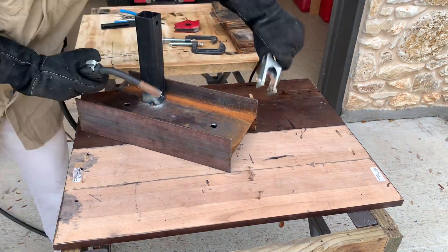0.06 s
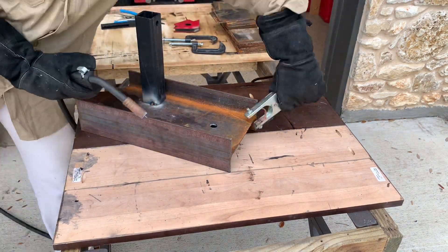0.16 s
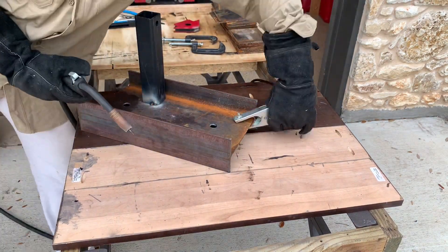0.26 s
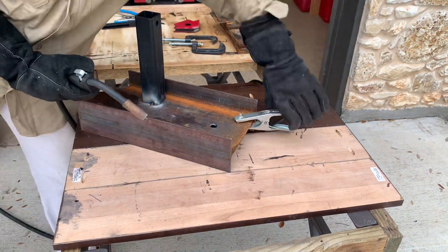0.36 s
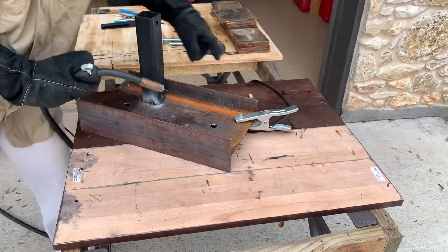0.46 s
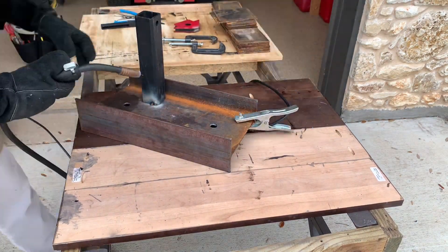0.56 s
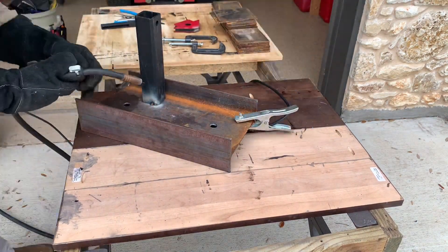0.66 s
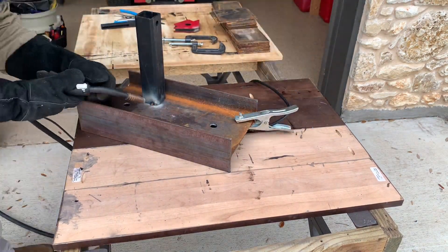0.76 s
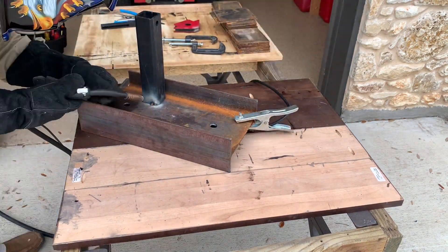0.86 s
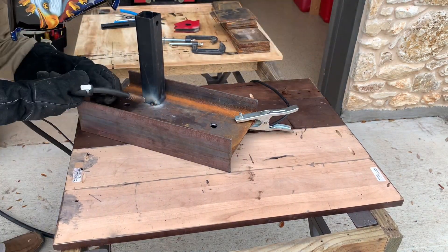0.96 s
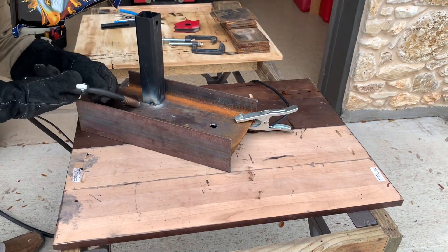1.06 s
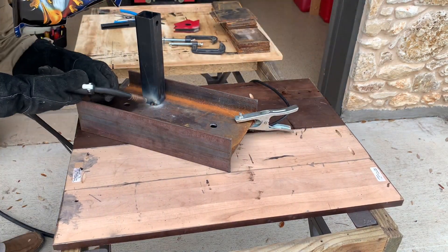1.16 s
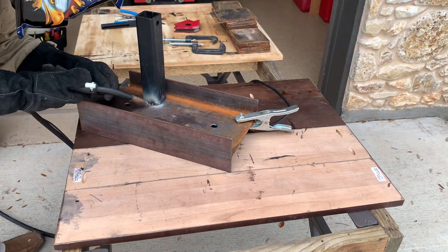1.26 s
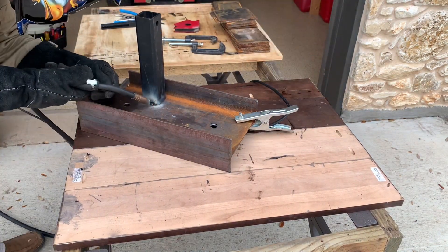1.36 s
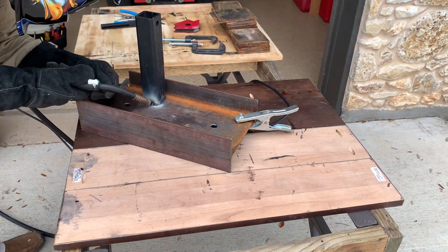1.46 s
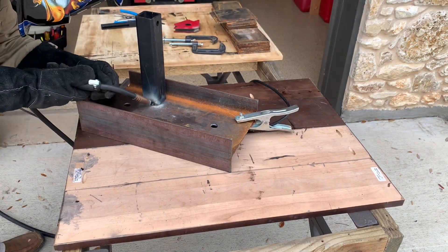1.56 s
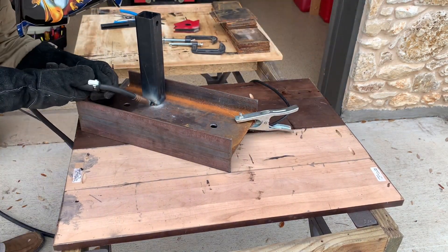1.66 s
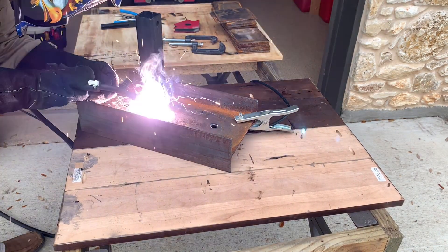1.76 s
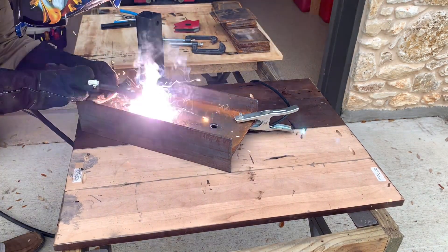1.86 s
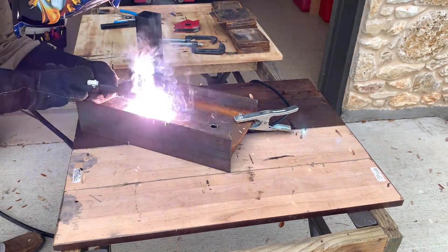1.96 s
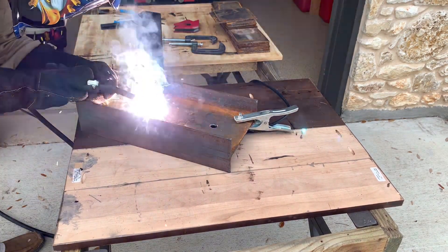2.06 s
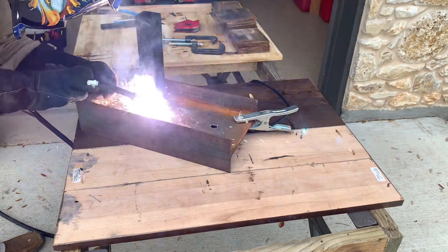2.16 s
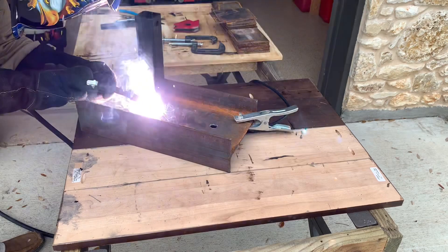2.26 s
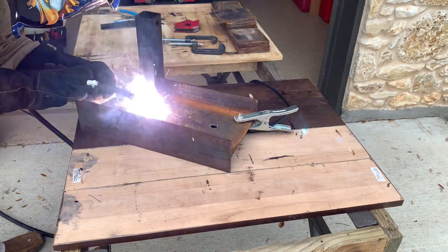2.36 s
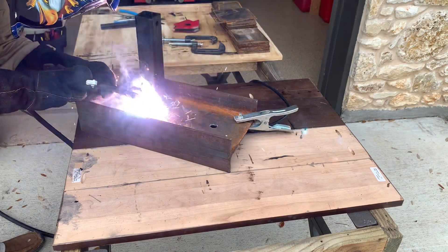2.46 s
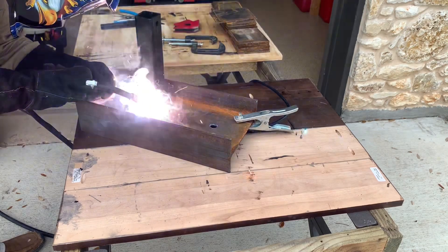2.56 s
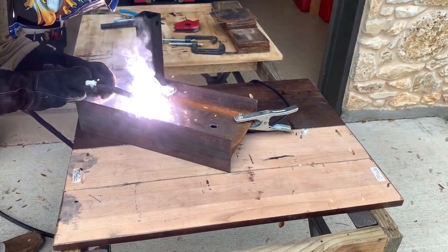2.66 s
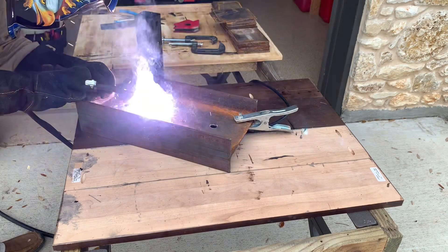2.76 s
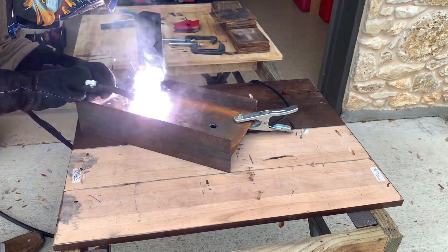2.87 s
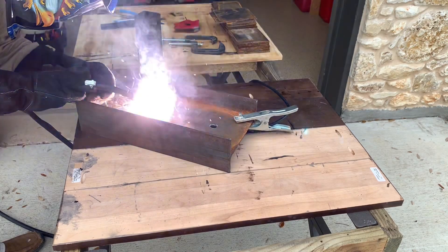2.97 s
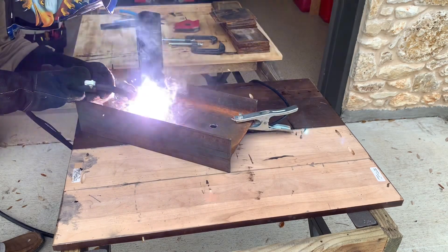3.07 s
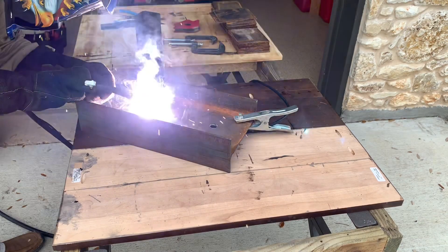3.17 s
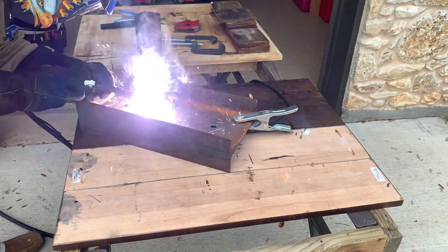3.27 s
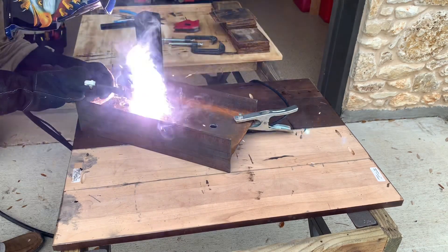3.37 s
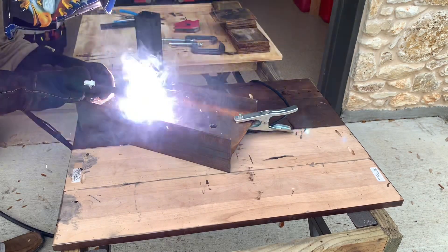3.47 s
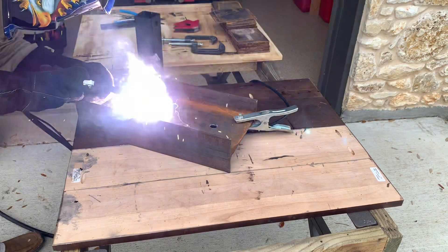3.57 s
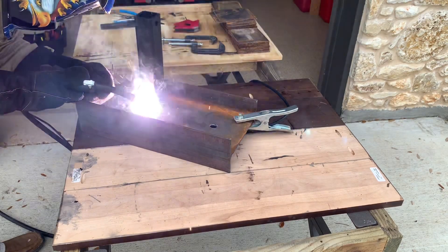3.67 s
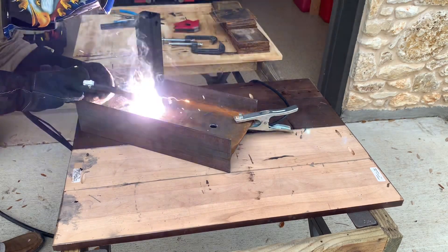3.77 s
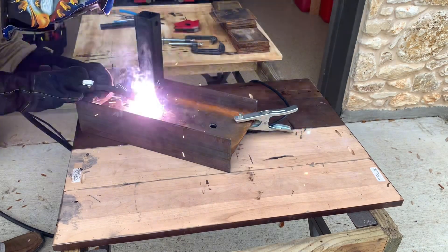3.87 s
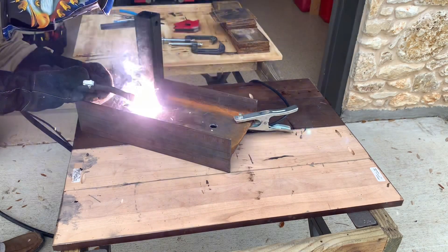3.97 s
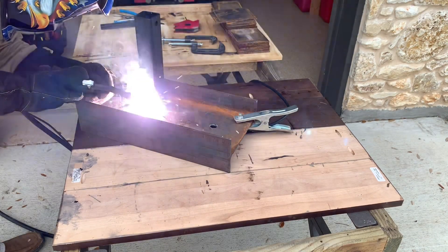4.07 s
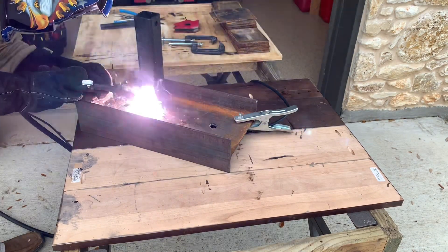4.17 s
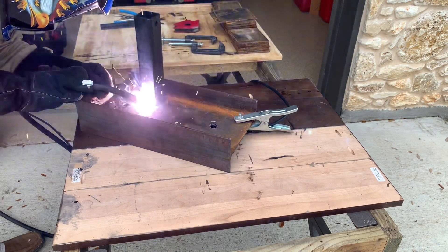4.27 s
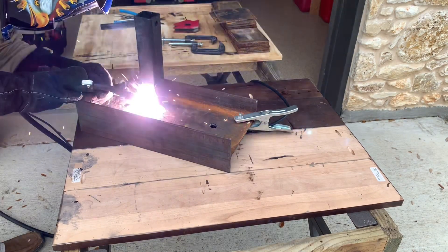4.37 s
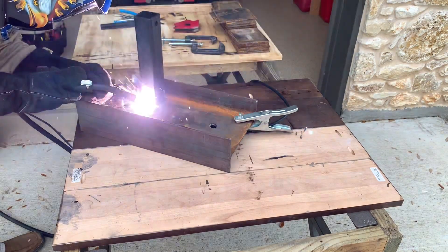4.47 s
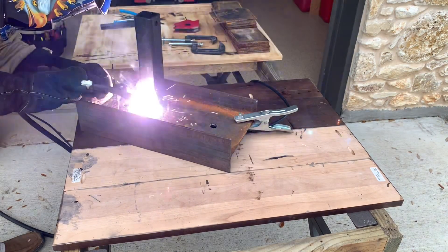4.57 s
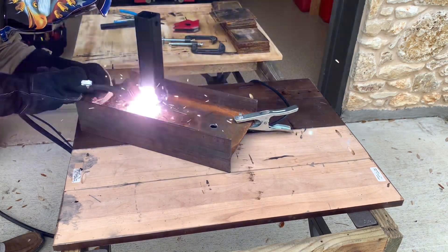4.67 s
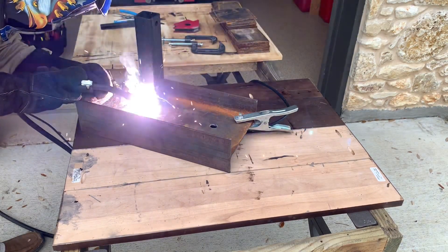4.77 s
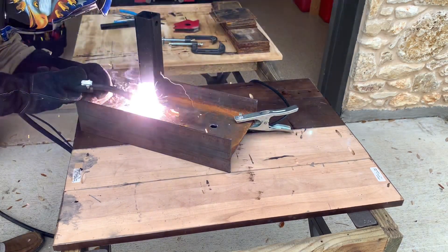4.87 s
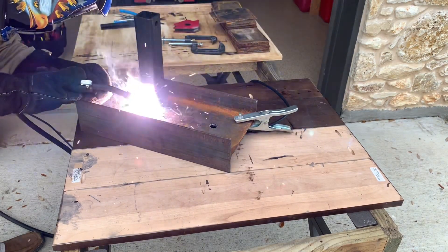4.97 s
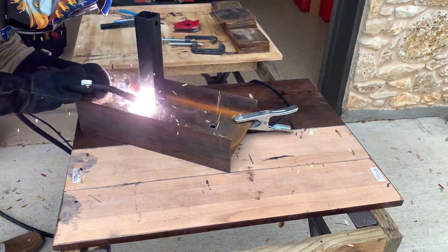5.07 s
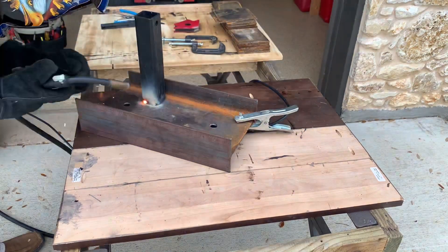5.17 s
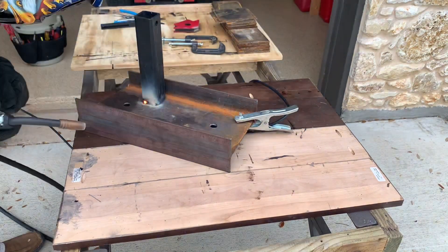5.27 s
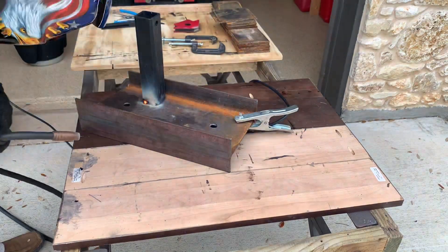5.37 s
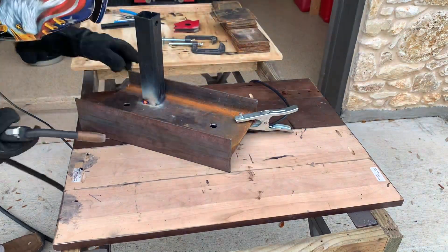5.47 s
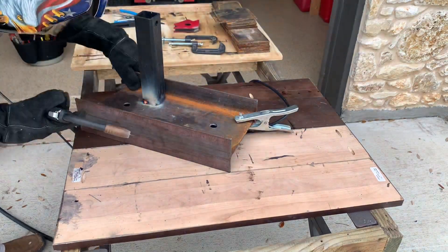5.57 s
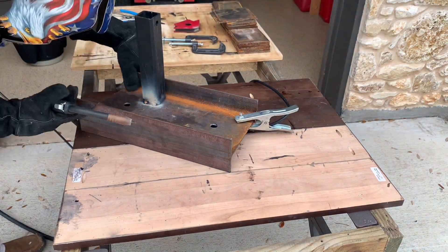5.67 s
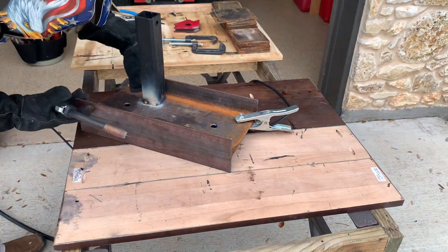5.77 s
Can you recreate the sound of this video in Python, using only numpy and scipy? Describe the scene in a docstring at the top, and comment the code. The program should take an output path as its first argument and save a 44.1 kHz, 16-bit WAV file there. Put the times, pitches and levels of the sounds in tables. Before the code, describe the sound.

A workshop doorway, heard in stereo from a phone about a metre away, with short reflections off bench and door frame. A fan murmurs behind: a low fluttering hum near 240 Hz over soft rushing air. At 0.1 s a glove bumps the wooden bench with a dull knock. From 0.2 to 0.36 s a spring clamp scrapes in quick gritty strokes and snaps onto steel with short rings. A tick at 0.54 and a nozzle slide at 0.66 follow, with soft glove rubs until about 1.3 s. At 1.73 s a weld strikes abruptly: loud, bright, dense frying, broken about thirty times a second by irregular tiny dips, sharp cracks and low gas puffs. The puffs are heaviest early, easing as it goes on. The fan is almost buried. At 5.13 s the arc cuts dead; the hum returns with light metallic ticks, a faint bump at 5.35 and tiny touches until 5.6, ending around 5.8 s.

```python
"""In a workshop doorway, about a metre from a phone with two microphone ports, a glove bumps the bench.
A spring earth clamp then scrapes and snaps onto a steel channel, gloves rub and a nozzle slides on the steel.
One wire-feed weld follows: frying grains that each short dims and each restrike bursts with a crack and gas puff.
Light ticks and a faint bump come after it. Behind it all lies a fan, fluttering blade tones over rushing air;
its tones fade almost away under the weld and return at its end."""
import sys
import numpy as np
from scipy import signal
from scipy.fft import rfft, irfft
from scipy.io import wavfile
from scipy.ndimage import uniform_filter1d, map_coordinates

SR = 44100
rng = np.random.default_rng(int(sys.argv[2]) if len(sys.argv) > 2 else 0)


def bounce(signal):
    """Save signal as a 16-bit WAV file at the path given by the first command-line argument."""
    frames = np.transpose(np.atleast_2d(signal))
    limited = np.clip(frames, -1, 1)
    pcm = np.round(limited * 32767).astype(np.int16)
    wavfile.write(sys.argv[1], SR, pcm)


N = 257103

# Levels in the tables are relative: filters and mixing gains follow.
# wire stubs into the pool and blows clear: start_s, crack_db, thump_db, hiss_at_short_db, hiss_relit_db
SHORTS = [(1.7318, -18, -30, 3.5, -4), (1.747, -19, -40, -0.5, 5), (1.757, -24, -33, 8, 3),
          (1.816, -22.5, -37.0, -6, -18), (1.8305, -21, -33, -2, -11), (1.8469, -19, -41.5, 1, 4),
          (1.8563, -14, -26.5, 6, 4), (1.884, -18, -27, 4, 4), (1.92, -20, -34, 1, 0.5),
          (1.9528, -21, -35, -5, 4), (1.969, -20, -34.5, 4, 1.5), (2.0371, -18.5, -46.5, -2, 1),
          (2.0576, -23, -46, -6, -7), (2.073, -26, -51, 1, 1.5), (2.096, -18, -28, 2, -5.5),
          (2.1287, -21, -31.5, -0.5, -3.5), (2.166, -20.5, -29.5, 2.5, 5), (2.21, -21.5, -38, -6, -1),
          (2.226, -24.5, -43, -2, -7.5), (2.2626, -24, -45.5, 6, -2), (2.282, -20, -57, 4, 4),
          (2.3248, -21.5, -62, -5, 0), (2.355, -23.5, -55.5, -3, -15), (2.3628, -23, -48, -3, -1),
          (2.3726, -23, -40.5, 0, 1), (2.4298, -22, -29, 3, 4), (2.5176, -23, -35, 2, 4),
          (2.5864, -21.5, -50, -4.5, -2), (2.5955, -23, -49, -3, 5), (2.6697, -20, -50.0, -4.5, -9.5),
          (2.6914, -20.5, -33, -6, -18), (2.705, -18.5, -35.5, -6, 5), (2.7174, -22, -36, 4, -2),
          (2.74, -24, -37, 4.5, -3), (2.767, -19, -36, 0, -9.5), (2.7965, -19.5, -31, -11, -13),
          (2.8129, -19, -32.5, 3.5, 0.5), (2.9136, -17, -44, 0.5, -6), (2.9356, -20.5, -48.0, -2.5, 3),
          (3.0171, -17.5, -35, 0.0, 4), (3.1368, -23, -36.5, 0.5, -8), (3.1577, -19.5, -45.5, -8, -4),
          (3.1791, -18.5, -42, 0, -8), (3.192, -22, -32, -2.5, 2), (3.203, -23, -49, -2, 3),
          (3.2206, -22, -34, 3.5, 6.5), (3.289, -22, -33.5, 1, -5), (3.3115, -21, -34.5, 1, -1),
          (3.329, -21, -34, -4, 6), (3.3372, -23, -43, 5, 3), (3.3644, -20.5, -37, 5, 0),
          (3.3998, -22, -53, -4, 2), (3.4316, -20, -56, -3, 5), (3.441, -21.5, -39.5, 0.5, -4),
          (3.4688, -33, -45, 9.5, -10), (3.48, -24, -37, -8, -9), (3.4992, -20, -35.5, -11, -5),
          (3.5179, -19.5, -36, 0, -3), (3.5403, -19, -42, 1, 0.5), (3.5656, -24, -35, 0.5, 2),
          (3.6084, -26, -54, -11, -7), (3.63, -19.5, -37.5, -4, -0.5), (3.66, -24, -52, -2, -11),
          (3.6693, -25, -47, -19, -4), (3.6857, -17.5, -40.0, -6, -9.5), (3.7009, -21, -37, 1, -15),
          (3.715, -20.5, -51, 3, -4), (3.7426, -20, -47.5, 0.5, 5), (3.813, -24, -45, 0, -3),
          (3.8348, -19.5, -44, -9, -7), (3.8432, -21.5, -33, -24, -2), (3.871, -18.5, -42, 2, 3.5),
          (3.9246, -25, -57, -1, -2), (3.9388, -25.5, -37.5, 1, -3), (3.9585, -27, -48, 0, -2),
          (3.9654, -21, -55, -1, -1), (3.9933, -21.0, -56, -1, 1.5), (4.034, -23.5, -44, -11, -12),
          (4.0568, -24.5, -48, -1, -5), (4.0678, -19.5, -45.5, 3.5, 1.5), (4.1063, -22, -34.5, 6.5, 3.5),
          (4.1686, -18.5, -35, -1, -7), (4.1816, -29, -40, -3, -2), (4.19, -22.5, -37, 2, -0.5),
          (4.2497, -21, -42, -0.5, -2), (4.2776, -22, -52.5, -4, -1.5), (4.2982, -20.5, -56, -9, -2),
          (4.3089, -23, -58, 2, 0), (4.325, -18, -44, 1, 3), (4.3347, -33, -50.5, 0.5, -3),
          (4.3495, -28, -52, 4, 5), (4.3537, -21.5, -48.5, -8, -10), (4.3706, -20, -39.5, 2, -4),
          (4.3882, -23, -40, -2, 3.5), (4.441, -20.5, -40, 0.5, -5), (4.4648, -18.5, -31.5, -3, -4),
          (4.4786, -27.5, -34.5, -13.5, -22), (4.4949, -21, -46.5, -5, -22), (4.5203, -21, -32, 1, -9),
          (4.5418, -17, -36, 3.5, -1), (4.5734, -21, -54.5, -1, 1), (4.5901, -24, -47, -8, 1),
          (4.6222, -18.5, -36.5, 4.5, 4.5), (4.655, -24, -46.5, -2, -2), (4.6618, -21, -40.5, -6, 0),
          (4.686, -32, -47, 3.5, 1.5), (4.721, -19.5, -35, -1, -1), (4.7408, -25, -50.5, -7, -4.5),
          (4.7644, -18, -33.5, -4, -10), (4.7871, -17.5, -32.5, -5, -6), (4.8027, -25, -54, 0.5, 2),
          (4.879, -24, -36, -1.5, -3.0), (4.8866, -23.5, -48.5, -7, -4), (4.901, -18.5, -32, 0, 2.5),
          (4.9397, -19.5, -32.5, -2, -4.0), (4.9474, -20, -53, -1.5, 0), (4.9787, -27, -36.5, 0, 1.5),
          (5.045, -19, -33, -2, 0.5), (5.0747, -25, -54, -7, -3), (5.0968, -18.5, -53, -19, -4),
          (5.1212, -17.5, -32, -1, -9)]
# colour of the arc's crackle: frequency_hz, level_db
ARC_COLOUR = [(700, -38.5), (1400, -25), (1750, -17), (2150, -7.5), (2700, -10.5), (3150, -14),
              (3480, -10.5), (4250, -16), (4700, -6), (5700, -9.5), (6170, -12), (6600, -4.5), (7600, -3.5),
              (8850, -2.5), (9150, -6.5), (9500, -4.5), (11900, -3), (12500, -6), (13200, -3.5),
              (14800, -7), (15700, -13)]
# colour of the arc's gas puffs: frequency_hz, level_db
PUFF_COLOUR = [(40, -44.5), (100, -10.5), (220, -2), (450, -1.5), (700, 0.5), (920, 6), (1150, -5),
               (1450, -15.5), (2500, -51)]
# gas booming in the hollow of the channel: pitch_hz, t60_s, level_db
HOLLOW_MODES = [(810, 0.018, -4.5), (924, 0.058, -0.5)]
# steel tube ringing faintly under the arc: pitch_hz, t60_s, level_db
TUBE_MODES = [(2220, .03, -9), (4090, 0.022, 2), (5230, 0.013, -4), (6800, 0.035, -1.5), (8740, 0.025, 5.5),
              (10300, .015, -6)]
# clamp jaws on the channel: peak_s, level_db, rise_s, decay_s, thud_db, ring_over_level_db, tilt_db_per_octave
CLAMP_STROKES = [(0.213, -50.5, 0.0049, 0.0065, -42.5, 7.5, 1.5),
                 (0.227, -51, 0.0054, 0.007, -48, 8.5, 2.5), (.276, -62, 0.008, 0.014, -51, 6, -3),
                 (0.291, -52, 0.0027, 0.007, -40.5, 0, -3), (.329, -51, 0.0072, 0.0056, -46, 6, -6.5),
                 (0.3407, -49.5, 0.0022, 0.0052, -34.5, -1, -4), (0.354, -49.5, 0.0055, 0.014, -64, -9, 9)]
# ringing of clamp and channel: pitch_hz, t60_s, level_db
STEEL_MODES = [(658, .09, 0), (1120, 0.1, -2), (1600, .04, -7), (1880, 0.098, 6), (2140, 0.098, 4),
               (2295, 0.075, 7.5), (2697, 0.067, -3), (3430, 0.08, 1.5), (3900, 0.035, 6), (4270, 0.043, 3),
               (4500, 0.05, 10.5), (4860, 0.033, -7), (4900, .04, -10), (5700, 0.064, 4), (6070, 0.04, -7),
               (6900, 0.096, 1), (7500, 0.045, -5), (8700, 0.054, -10)]
# colour of the jaws' scrape: frequency_hz, level_db
SCRAPE_COLOUR = [(500, -22), (1500, 4), (2200, 4), (4600, 5), (7000, -4), (9500, -1), (11300, -20),
                 (14000, -11), (16000, -63)]
# torch and cable tick as they are handled, and a last spark of spatter just after the arc goes out: peak_s,
# level_db, decay_s
TICKS = [(.543, -58, 0.0071), (5.177, -55, 0.0056), (5.266, -67, 0.0087), (5.34, -67, 0.017),
         (5.374, -65, 0.007), (5.519, -69, 0.021), (5.589, -69, .007)]
# ringing of the nozzle: pitch_hz, t60_s, level_db
NOZZLE_MODES = [(940, .035, 4), (1370, .03, -16), (3010, 0.028, -1), (3380, .025, -12), (3970, .02, -9),
                (7500, 0.023, -3)]
# colour of the nozzle's slide and of the bench tap: frequency_hz, level_db
CONTACT_COLOUR = [(300, 6), (900, 12), (2200, 14), (4000, 6), (8500, 0), (12000, -7), (16000, -13)]
# colour of gloves and light ticks: frequency_hz, level_db
TOUCH_COLOUR = [(300, 0.5), (900, 11), (2200, 7.5), (4500, -0.5), (8000, 1.5), (12000, -14), (16000, -14.5)]
# glove bumps the bench: start_s, level_db, contact_s
KNOCKS = [(0.104, -44, .0004), (0.111, -36.5, .00012), (0.115, -24.5, 0.00075), (5.348, -47, 0.00021)]
# wooden bench top: pitch_hz, t60_s, level_db
BENCH_MODES = [(152, 0.075, 7), (208, 0.11, 6.5), (372, 0.034, 22), (468, 0.03, 22), (675, 0.07, 9),
               (860, 0.036, 11), (1060, 0.025, -4), (1920, 0.022, 5)]
# gloves and sleeves brush past: peak_s, level_db, rise_s, decay_s
RUSTLES = [(.07, -68, 0.086, 0.1), (.585, -65, .006, .012), (.762, -61.5, 0.0094, 0.012),
           (.89, -64.5, 0.025, 0.045), (1.105, -66.5, 0.0063, 0.028), (1.176, -69, .005, 0.01),
           (1.312, -66, 0.0058, 0.0082)]
# blade tones of the machine's fan, all together: time_s, level_db
FAN_LEVEL = [(0, -57.5), (.3, -56), (.55, -54), (1.65, -52.5), (2, -81), (5.2, -61), (5.83, -60)]
# partials of the blade tone: multiple, level_db
FAN_PARTIALS = [(1, 10), (2, -2), (3, -11)]
# colour of the fan's rush and the yard outside: frequency_hz, level_db
AIR_COLOUR = [(25, -39.5), (60, -10), (130, -2), (235, 6), (295, 0.5), (340, -6), (520, -2.5), (750, -11),
              (1100, -18), (2200, -28.5), (4000, -39.5), (7000, -49), (9000, -30.5), (10500, -52),
              (15000, -51.5)]
# loudness of that rush: time_s, level_db
AIR_LEVEL = [(0, -55), (1.7, -55.5), (2.2, -66.5), (5.2, -61), (5.83, -59.5)]
# echoes off bench and door frame: delay_s, level_db
ECHOES = [(.0011, -6.5), (.0057, -9.5), (.0096, -8)]
# phase between the phone's microphone ports: frequency_hz, left_lead_rad
PORT_PHASE = [(0, 0), (1290, 1.63), (1640, 2.5), (3360, 3.5), (4050, 4.5), (4820, 7), (5080, 8.5),
              (6290, 3.5), (6890, 3), (9470, -0.14), (13400, -6), (14400, -6)]
# balance between the ports: frequency_hz, left_minus_right_db
PORT_BALANCE = [(60, -0.5), (110, -1), (200, 0), (380, -1.5), (700, 6), (1290, 1), (2380, 0.5),
                (4400, -3.5), (8120, 2), (15000, -1)]

# weld: full current from and to, time constants of striking and going out
ARC_ON_S, ARC_OFF_S, STRIKE_S, QUENCH_S = 1.727, 5.128, 0.0041, 0.0073
# burning arc: level at the start, easing as the steel heats
ARC_DB, ARC_DB_PER_S = -29.5, -0.31
# heaving of hot gas over the pool: level at the start, easing
HEAVE_DB, HEAVE_DB_PER_S = -43.5, -1.2
RELIT_SHARE = 0.48  # the hiss reaches its relit level after this share of the time to the next short
PUFF_LAG_S = .0008  # puff after crack
# reflection off the channel, wandering as the torch weaves
MIRROR_S, MIRROR_WANDER_S, MIRROR_DB = .0013, .0002, -11.5
# nozzle slides along the steel
SLIDE_S, SLIDE_DB, SLIDE_RISE_S, SLIDE_DECAY_S = 0.661, -45, 0.0091, 0.014
# small shifts of cloth between the strokes: level and variation
FIDGET_DB, FIDGET_SPREAD_DB = -85, 4
BLADE_HZ = 241.8  # blade tone, before its waver
TOP_HZ = 15650  # upper limit of the phone


def arc(short_s=0.0034, relight_s=0.00059, snuff=0.5, spatter_s=0.00086, crack_db=17.0, spatter_db=-1.0,
        snap_db=-10, thump_db=18.0, surge_db=0.68, tube_db=-22, hollow_db=-14):
    """The arc fries; each short dims it, then bursts with a crack, a spray of spatter and a puff of gas."""
    times, crack, thump, shorting_db, relit_db = np.transpose(SHORTS)
    length = arc_length(times, shorting_db, relit_db)
    shorts = strikes(times, np.ones(len(times)))
    bursts = strikes(times, undb(crack))

    # the arc dies down while the wire touches the pool and takes a moment to relight
    dimming = lead_in(shorts, short_s) + die_away(shorts, relight_s)
    burning = 1 - np.clip(snuff * dimming, 0, .7)
    strength = current(ARC_DB, ARC_DB_PER_S) * length * undb(surge_db * walk(70))
    frying = grains(rate=14000, spread_db=2.5) * undb(1.8 * walk(450))
    snaps = grains(rate=45, spread_db=-3.5) * undb(snap_db)
    spray = undb(spatter_db) * die_away(bursts, spatter_s) * rng.standard_normal(N)
    crackle = (frying + snaps) * strength * burning + undb(crack_db) * bursts + spray

    # the gas keeps heaving for as long as current flows
    heave = grains(rate=700, spread_db=2.5) * current(HEAVE_DB, HEAVE_DB_PER_S)
    heave = heave * np.minimum(length / undb(-4.0), 1)
    puffs = heave + undb(thump_db) * strikes(times + PUFF_LAG_S, undb(thump))

    # the channel mirrors the crackle and the tube answers it
    delay = MIRROR_S + MIRROR_WANDER_S * walk(2)
    mirrored = map_coordinates(crackle, [(clock() - delay) * SR], order=3)
    crackle = crackle + undb(MIRROR_DB) * mirrored
    crackle = place(crackle, scatter_db=-4, scatter_s=.0008, room_db=-22, room_t60=.15)
    crackle = crackle + undb(tube_db) * ring(crackle, TUBE_MODES)
    puffs = place(puffs, scatter_db=-6.5, scatter_s=.004, room_db=-9.5, room_t60=0.31)

    bright = flicker(colour(crackle, ARC_COLOUR), depth_db=2.0)
    boom = undb(hollow_db) * ring(puffs, HOLLOW_MODES)
    return bright + colour(puffs, PUFF_COLOUR) + boom


def current(db, db_per_s):
    """Gain that rises as the arc strikes, eases during the weld and drops when the trigger is released."""
    t = clock()
    edges = np.minimum((t - ARC_ON_S) / STRIKE_S, (ARC_OFF_S - t) / QUENCH_S)
    gate = np.exp(np.clip(edges, -50, 0))
    return gate * undb(db + db_per_s * (t - ARC_ON_S))


def arc_length(times, shorting_db, relit_db):
    """Gain of the hiss as the arc length changes, moving between each short's level and its relit level."""
    relit = times + RELIT_SHARE * np.diff(times, append=ARC_OFF_S)
    return curve(np.column_stack([times, shorting_db, relit, relit_db]).reshape(-1, 2))


def flicker(x, above_hz=10000, depth_db=2):
    """The top of the sound brightens and dulls by chance."""
    top = signal.sosfiltfilt(signal.butter(2, above_hz, "high", fs=SR, output="sos"), x)
    return x + top * (undb(depth_db * walk(35)) - 1)


def clamp(scrape_db=-1, spot_db=1, pivot_hz=3000):
    """Jaws stick and slip over rusty steel, ring it differently at each spot and thud through to the bench."""
    slips = place(grains(rate=3500, spread_db=3.5), scatter_db=1.5, scatter_s=0.0012, room_db=-18, room_t60=.12)
    spots = rng.standard_normal((len(CLAMP_STROKES), len(STEEL_MODES)))
    sound, push = 0, 0
    for (s, db, rise, decay, thud_db, ring_db, tilt), spot in zip(CLAMP_STROKES, spots):
        stroke = undb(db) * swell(s, rise, decay) * slips
        modes = [(hz, t60, mode_db + tilt * np.log2(hz / pivot_hz) + spot_db * chance)
                 for (hz, t60, mode_db), chance in zip(STEEL_MODES, spot)]
        scrape = [(hz, band_db + tilt * np.log2(hz / pivot_hz)) for hz, band_db in SCRAPE_COLOUR]
        sound = sound + undb(ring_db) * ring(stroke, modes)
        sound = sound + undb(scrape_db) * colour(stroke, scrape)
        push = push + undb(thud_db) * swell(s, rise, decay / 2)
    return sound + ring(push * slips, BENCH_MODES)


def torch(tick_rise_s=0.0015, ring_db=-4, tick_ring_db=-15, bench_db=-7):
    """The nozzle grates over the steel, rings and jars the bench; lighter touches and a last spark of spatter
    tick and ring the steel."""
    slips = place(grains(rate=3600, spread_db=-3.0), scatter_db=8, scatter_s=0.0026, room_db=-12, room_t60=.12)
    slide = undb(SLIDE_DB) * swell(SLIDE_S, SLIDE_RISE_S, SLIDE_DECAY_S) * slips
    ticks = sum(undb(db) * swell(s, tick_rise_s, decay) for s, db, decay in TICKS) * slips
    grating = colour(slide, CONTACT_COLOUR) + undb(ring_db) * ring(slide, NOZZLE_MODES)
    jarring = undb(bench_db) * ring(slide, BENCH_MODES)
    ticking = colour(ticks, TOUCH_COLOUR) + undb(tick_ring_db) * ring(ticks, STEEL_MODES)
    return grating + jarring + ticking


def knock(body_db=21, tick_db=-14, lowest_hz=90):
    """Glove blows ring the bench top; the longer the contact, the duller the blow."""
    # dividing by the contact time keeps the push of a blow the same
    blows = sum(die_away(strikes([s], [undb(db)]), contact) / (contact * SR) for s, db, contact in KNOCKS)
    blows = signal.sosfilt(signal.butter(2, lowest_hz, "high", fs=SR, output="sos"), ports(blows))
    return undb(body_db) * ring(blows, BENCH_MODES) + undb(tick_db) * colour(blows, CONTACT_COLOUR)


def gloves():
    """Leather and cloth rub in short strokes of fine grains, and shift faintly in between."""
    strokes = sum(undb(db) * swell(s, rise, decay) for s, db, rise, decay in RUSTLES)
    fidget = undb(FIDGET_DB + FIDGET_SPREAD_DB * walk(23))
    rubbing = (strokes + fidget) * grains(rate=1800, spread_db=3)
    placed = place(rubbing, scatter_db=2.0, scatter_s=0.0015, room_db=-11, room_t60=0.11)
    return colour(placed, TOUCH_COLOUR)


def fan(waver=0.0019, gusty=0.2, right_db=1):
    """Blade tones flutter in pitch and strength in turbulent air, over a broad rush."""
    turn = 2 * np.pi * np.cumsum(BLADE_HZ * (1 + waver * walk(6))) / SR
    tones = 0
    for k, db in FAN_PARTIALS:
        steady = (1 + gusty * walk(20)) * np.sin(k * turn)
        flutter = gusty * walk(20) * np.cos(k * turn)
        tones = tones + undb(db) * (steady + flutter)
    air = unit(colour(diffuse(), AIR_COLOUR)) * curve(AIR_LEVEL) * undb(.6 * walk(6))
    balance = undb(np.array([[-right_db], [right_db]]) / 2)
    return (unit(tones) * curve(FAN_LEVEL) + air) * balance


def place(x, scatter_db, scatter_s, room_db, room_t60, echo_s=0.0021, size=8192):
    """Direct sound plus noise shaped by the energy of its reflections: nearby scatter, echoes and room."""
    t = np.arange(size) / SR
    near, far = np.exp(-2 * t / scatter_s), undb(-120 * t / room_t60)
    # each echo is spread over echo_s
    echoes = sum(undb(2 * db) * np.exp(-((t - s) / echo_s) ** 2) for s, db in ECHOES)
    echoes = echoes / (np.sqrt(np.pi) * echo_s * SR)
    energy = undb(2 * scatter_db) * near / near.sum() + undb(2 * room_db) * far / far.sum() + echoes
    scattered = np.sqrt(np.abs(convolve(x ** 2, energy))) * diffuse()
    return (ports(x) + scattered) / np.sqrt(1 + energy.sum())


def diffuse(wide_hz=700, bass_side=0.552):
    """Noise from all directions: more alike at the two ports in the bass, unrelated in the treble."""
    mid, side = rng.standard_normal((2, N))
    treble = signal.sosfilt(signal.butter(2, wide_hz, "high", fs=SR, output="sos"), side)
    return unit(mid + np.array([[1], [-1]]) * (bass_side * side + (1 - bass_side) * treble))


def ports(x, size=256):
    """Direct sound reaches the two microphone ports with different phase and level."""
    f = np.arange(size // 2 + 1) * SR / size
    phase = np.interp(f, *np.transpose(PORT_PHASE))
    balance_db = np.interp(f, *np.transpose(PORT_BALANCE))
    half = np.exp(1j * phase / 2) * undb(balance_db / 2)  # each port takes half the difference
    responses = [np.fft.fftshift(irfft(h)) * np.hanning(size) for h in (half, 1 / half)]
    return np.array([signal.oaconvolve(x, response, "same") for response in responses])


def ring(x, modes, size=8192):
    """Decaying modes (pitch_hz, t60_s, level_db), together of unit energy, driven by x."""
    t = np.arange(size) / SR
    response = sum(undb(db) * np.cos(2 * np.pi * hz * t) * np.exp(-np.log(1000) * t / t60)
                   for hz, t60, db in modes)
    return convolve(x, response / np.linalg.norm(response))


def colour(x, points, size=4096):
    """Causal minimum-phase filter of unit energy through (frequency_hz, level_db) points."""
    hz, db = np.transpose(points)
    f = np.maximum(np.arange(size // 2 + 1) * SR / size, 1)
    cepstrum = irfft(np.log(undb(np.interp(np.log(f), np.log(hz), db))))
    # folding the cepstrum forward in time makes the filter causal
    cepstrum[1:size // 2] *= 2
    cepstrum[size // 2 + 1:] = 0
    response = irfft(np.exp(rfft(cepstrum)))
    return convolve(x, response / np.linalg.norm(response))


def convolve(x, response):
    """Pass a sound of one or two channels through an impulse response."""
    return signal.oaconvolve(x, response if x.ndim == 1 else response[None], axes=-1)[..., :N]


def grains(rate, spread_db):
    """Random tiny clicks of uneven size, rate per second, rms 1."""
    polarity, size = rng.standard_normal((2, N))
    clicks = (rng.random(N) < rate / SR) * np.sign(polarity)
    return unit(clicks * undb(spread_db * np.clip(size, -2.5, 2.5)))


def strikes(times, sizes):
    """One impulse for each event."""
    return np.bincount((np.asarray(times) * SR).astype(int), sizes, N)[:N]


def swell(at, rise, decay):
    """Envelope that grows to a moment and dies away."""
    t = clock() - at
    return np.exp(np.maximum(np.minimum(t / rise, -t / decay), -50))


def die_away(x, decay_s):
    """Envelope that fades after each impulse of x."""
    return convolve(x, np.exp(-clock()[:SR // 4] / decay_s))


def lead_in(x, rise_s):
    """Envelope that grows towards each impulse of x."""
    return die_away(x[::-1], rise_s)[::-1]


def walk(rate):
    """Smooth chance with spread near 1, drawn anew rate times a second."""
    k = max(int(SR / rate), 1)
    steps = np.repeat(rng.standard_normal(N // k + 1), k)
    return 1.3 * uniform_filter1d(uniform_filter1d(steps, k), k)[:N]


def curve(rows):
    """Gain that follows (time_s, level_db) rows and holds beyond them."""
    return undb(np.interp(clock(), *np.transpose(rows)))


def unit(x):
    """Scale to rms 1."""
    return x / np.sqrt(np.mean(x ** 2))


def undb(db):
    """Decibels to gain."""
    return 10 ** (np.asarray(db) / 20)


def clock():
    """Time of every sample in seconds."""
    return np.arange(N) / SR


def scene():
    """The weld, the handling around it, and the fan behind."""
    return arc() + clamp() + torch() + knock() + gloves() + fan()


def record(dry):
    """The phone rounds the very sharpest cracks and cuts the top."""
    rounded = .6 * np.tanh(dry / .6)
    return signal.sosfilt(signal.ellip(10, .2, 70, TOP_HZ, fs=SR, output="sos"), rounded)


dry = scene()
out = record(dry)
bounce(out)
```